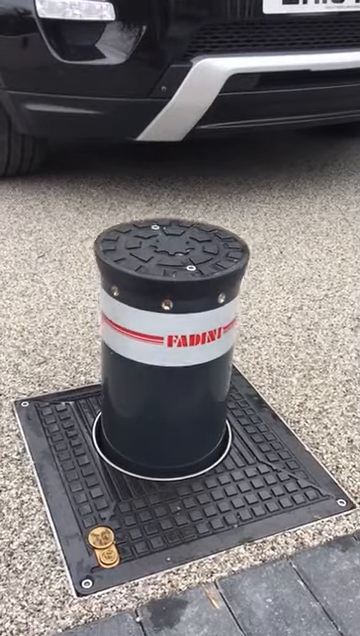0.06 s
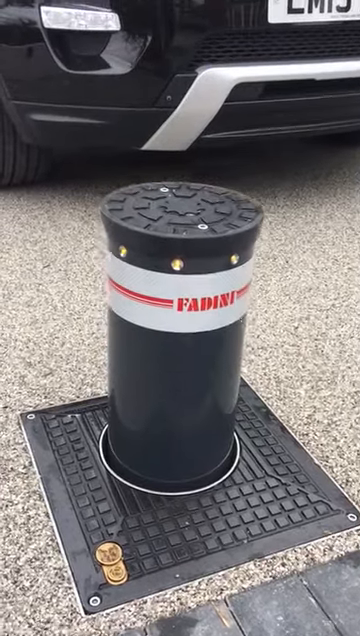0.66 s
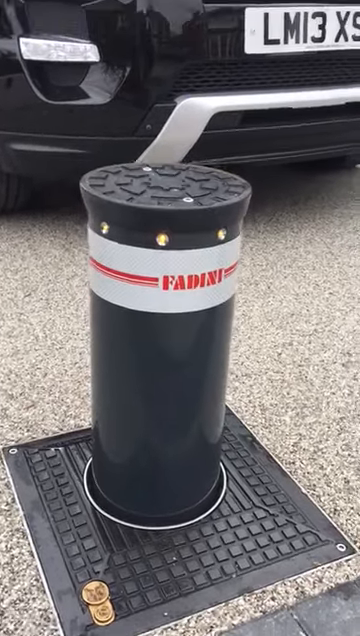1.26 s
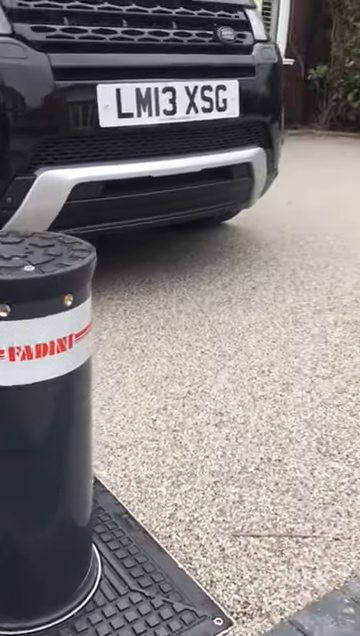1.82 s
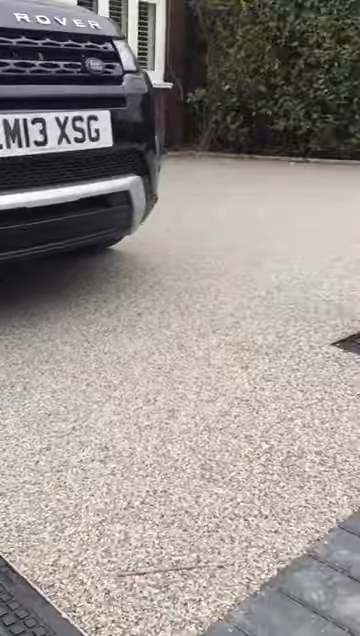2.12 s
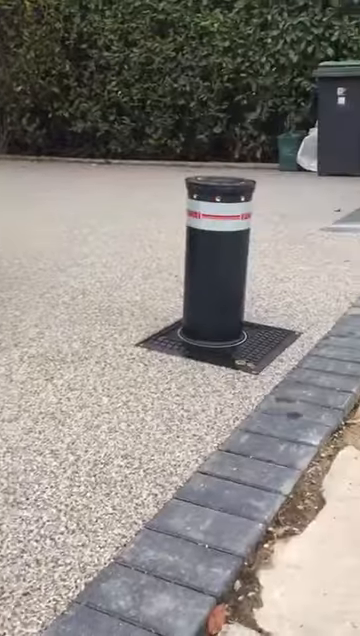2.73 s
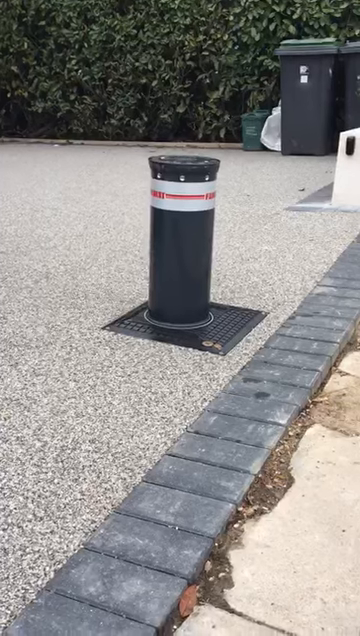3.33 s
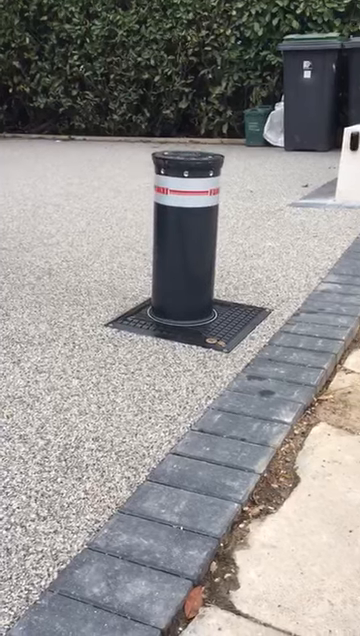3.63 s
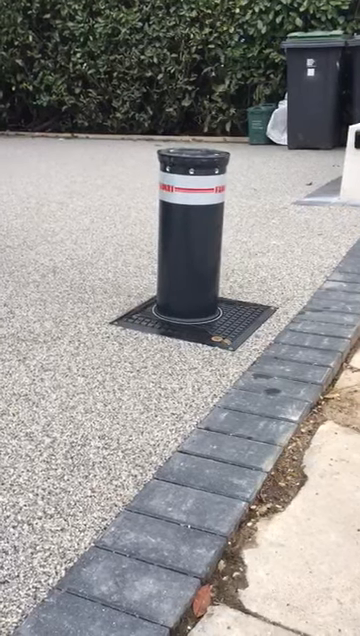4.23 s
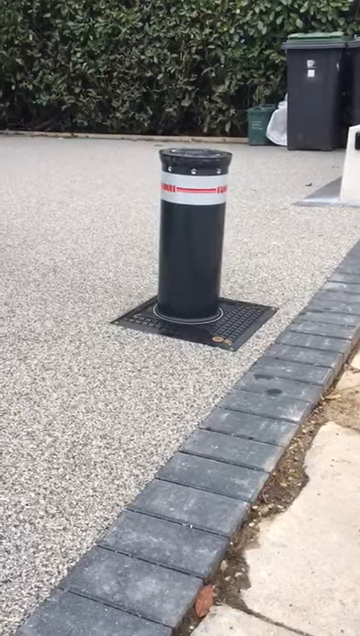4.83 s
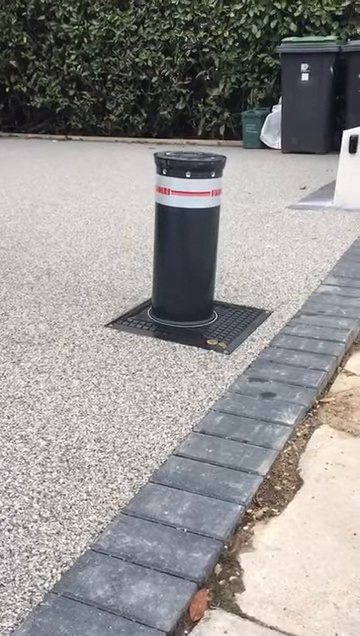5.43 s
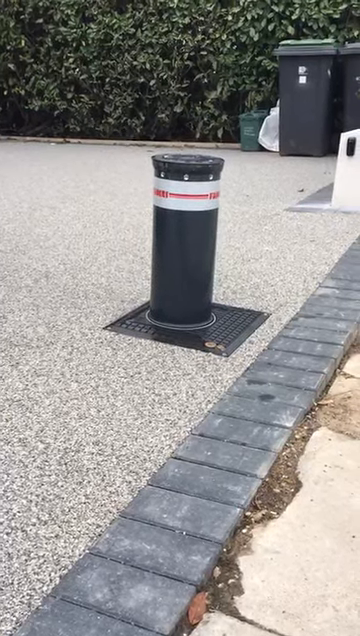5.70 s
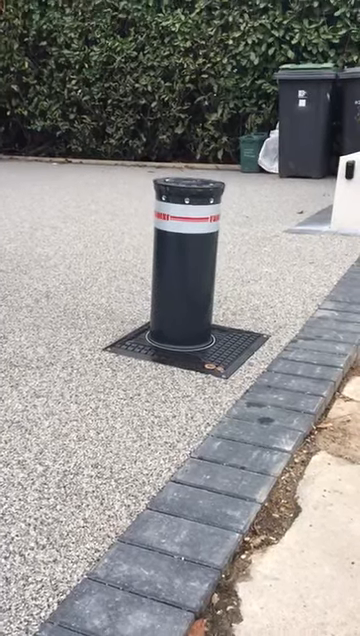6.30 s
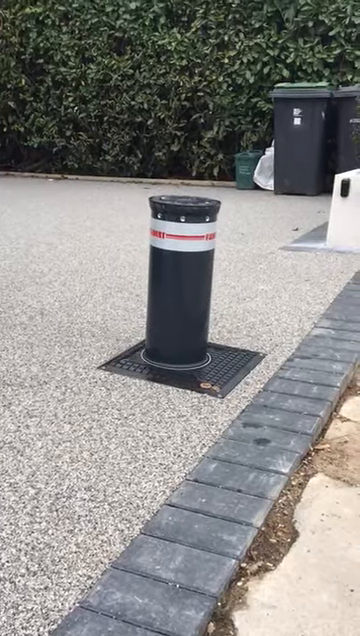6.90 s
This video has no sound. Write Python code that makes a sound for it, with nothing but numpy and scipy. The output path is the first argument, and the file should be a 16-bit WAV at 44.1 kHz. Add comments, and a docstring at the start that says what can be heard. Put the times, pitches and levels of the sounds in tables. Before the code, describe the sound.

A motorized bollard rises with a hydraulic whir and hiss, then stops, leaving idling engines throbbing and cars passing nearby.

```python
"""A bollard rising in a driveway

Motor and hydraulic pump whir, oil hisses through a valve, and a whistle sinks as the steel tube lifts;
the pump eases near the top and cuts out at about 2 s. Two idling engines, one nearer, one farther off,
beat against each other while cars pass out on the road. A breeze nudges the hand-held microphone."""
import sys
import numpy as np
from scipy import signal
from scipy.fft import rfft, irfft, next_fast_len
from scipy.io import wavfile

SR = 44100
rng = np.random.default_rng(int(sys.argv[2]) if len(sys.argv) > 2 else 0)


def wav_record(signal):
    """Record a signal, one row per channel, as 16-bit PCM in the file named by sys.argv[1]."""
    frames = np.transpose(np.atleast_2d(signal))
    bounded = np.clip(frames, -1, 1)
    # unit amplitude maps onto the largest positive 16-bit level
    quanta = np.round(bounded * 32767).astype(np.int16)
    wavfile.write(sys.argv[1], SR, quanta)


N = 315315
TIME = np.arange(N) / SR


def from_db(db):
    """Decibels to gain."""
    return 10 ** (np.asarray(db) / 20)


def unit_power(x):
    """Scale to an RMS of 1."""
    return x / np.sqrt(np.mean(x ** 2) + 1e-20)


def in_time(rows):
    """One value per sample for each column after the time column."""
    times, *columns = np.transpose(rows)
    return [np.interp(TIME, times, column) for column in columns]


def bell(x, width):
    """A smooth hump of height 1 around zero."""
    return np.exp(-(x / width) ** 2)


def hump(at_s, half_s, height):
    """A rise to the given height and a fall back to zero."""
    return height * bell(TIME - at_s, half_s)


def shift(at_s, over_s, change):
    """A lasting linear change, half done at at_s."""
    return change * np.clip((TIME - at_s) / over_s + .5, 0, 1)


def turning(hz):
    """The angle of something that turns at this rate."""
    return 2 * np.pi * np.cumsum(hz + np.zeros(N)) / SR


def tone(angle):
    """A sine of unit power with a random starting phase."""
    return np.sqrt(2) * np.sin(angle + rng.uniform(0, 2 * np.pi))


def drift(hz):
    """Smooth random motion of spread 1, mostly slower than hz."""
    step, settle = 40, 2000   # samples per step; steps for the filter to settle
    pole = np.exp(-2 * np.pi * hz * step / SR)
    white = rng.standard_normal(N // step + settle + 2)
    slow = signal.lfilter([1], [1, -2 * pole, pole * pole], white)[settle:]
    return np.interp(np.arange(N) / step, np.arange(len(slow)), unit_power(slow))


def noise(spectrum):
    """Unit-power noise coloured by (frequency [Hz], relative level [dB]), falling away beyond the ends."""
    size = next_fast_len(N)
    hz, db = np.transpose(spectrum)
    bins = np.maximum(np.arange(size // 2 + 1) * SR / size, 1)
    skirts = (np.minimum(bins / hz[0], 1) * np.minimum(hz[-1] / bins, 1)) ** 2
    gain = from_db(np.interp(np.log(bins), np.log(hz), db)) * skirts
    return unit_power(irfft(rfft(rng.standard_normal(size)) * gain, size)[:N])


def narrow_noise(hz, spread_hz):
    """A rough tone of random strength and phase, at unit power."""
    angle = turning(hz)
    return drift(spread_hz) * np.sin(angle) + drift(spread_hz) * np.cos(angle)


def stroke(full_db, eased_by_db, lag_s=0, coast_s=0):
    """Gain of one part of the bollard's drive: full flow, eased near the top, then running down."""
    ease_s, stop_s, run_down_db_per_s = 1.611, 1.984, 270
    easing_db = shift(ease_s + lag_s, over_s=0.064, change=eased_by_db)
    run_down_db = run_down_db_per_s * np.clip(TIME - stop_s - coast_s, 0, 1)
    return from_db(full_db + easing_db - run_down_db)


# The tube's resonance, sinking as it rises from the driveway: (time [s], frequency [Hz], lift [dB])
TUBE_RESONANCE = [(0, 5100, -3), (.22, 4740, 0), (.36, 4480, 6), (.47, 4310, 13), (.55, 4260, 9),
                  (.62, 4150, 5), (.71, 4040, 9.5), (.8, 3950, 9), (.94, 3747, 13), (1.05, 3640, 16),
                  (1.16, 3576, 15.5), (1.3, 3520, 13), (1.41, 3440, 4), (1.5, 3400, 2), (1.62, 3350, -10)]

def tube_whistle(base_db=-64.5):
    """Turbulence rings the resonance of the lengthening tube."""
    centre_hz, lift_db = in_time(TUBE_RESONANCE)
    return from_db(base_db + lift_db) * narrow_noise(centre_hz, spread_hz=70)


# The pump's tones: (multiple of the pump rate, relative level [dB])
PUMP_HARMONICS = [(6, -57), (12, -58), (16, -63), (17, -58.5), (20, -60), (21, -68.5), (23, -64),
                  (24, -60.5), (25, -62), (27, -61), (28, -59.5), (32, -66), (33, -60), (35, -65),
                  (36, -63.5), (37, -61.5), (39, -62.5), (41, -62.5), (42, -65), (43, -60), (44, -68),
                  (45, -63.5), (46, -66), (47, -63.5), (49, -66.5), (53, -62), (54, -62.5), (66, -65)]
# Brief swells of the closest harmonic: (time [s], half length [s], frequency [Hz], lift [dB])
PUMP_SWELLS = [(.55, 0.32, 2694, 4), (0.76, .12, 4425, 10), (.925, 0.13, 1539, 14.5),
               (1.146, 0.12, 2212, 17), (1.2, .2, 5195, 3), (1.36, .12, 2309, 9.5), (1.428, 0.2, 2020, 16),
               (1.47, .1, 4714, 11), (1.479, .09, 3367, 11), (1.945, 0.075, 3367, 12),
               (1.91, 0.05, 4329, 6)]
PUMP_HZ = 96.2

def pump_whine(angle, sung_db=-59.5, width_hz=92, waver_db=3.0):
    """Pump harmonics; each sings out as the tube's resonance slides across it."""
    centre_hz, lift_db = in_time(TUBE_RESONANCE)
    resonance = from_db(sung_db + lift_db)
    whine = np.zeros(N)
    for order, db in PUMP_HARMONICS:
        level_db = db + waver_db * drift(6.8)
        for at_s, half_s, hz, swell_db in PUMP_SWELLS:
            if round(hz / PUMP_HZ) == order:
                level_db += hump(at_s, half_s, swell_db)
        sung = resonance * bell(order * PUMP_HZ - centre_hz, width_hz)
        whine += np.hypot(from_db(level_db), sung) * tone(order * angle)
    return whine


def pump_buzz(angle, base_db=-71.5, scatter_db=6.5):
    """Faint, uneven upper harmonics of the pump give the hiss a metallic edge."""
    orders = np.arange(55, 104)
    gains = from_db(base_db + scatter_db * rng.uniform(-1, 1, len(orders)))
    return sum(gain * tone(order * angle) for order, gain in zip(orders, gains))


# Oil in the valve: (frequency [Hz], relative level [dB])
VALVE_SPECTRUM = [(700, -12), (1300, -1), (2000, 3), (2500, 1), (2900, -0.5), (3600, 2), (4400, 1),
                  (4900, -0.5), (5700, 0.5), (6200, 0.5), (7200, -2), (8200, 3.5), (9600, -2), (10500, 2.5)]

def oil_hiss(angle, ripple=0.038):
    """Oil hisses through the valve, its flow pulsing with the pump."""
    pulsing = 1 + ripple * np.sin(angle)
    return stroke(full_db=-42.5, eased_by_db=-8) * noise(VALVE_SPECTRUM) * pulsing


# Oil heard through the casing: (frequency [Hz], relative level [dB])
CASING_SPECTRUM = [(100, -34), (190, -3.5), (260, -1.5), (320, -2), (385, 1), (425, -7.5), (620, -7),
                   (800, -10), (1150, -18.5), (1800, -32), (4000, -60.5)]
COAST_S = 0.012   # the motor runs on after the valve shuts

def oil_churn(base_db=-40.5, surge_db=3.1, rough_db=2.0):
    """Oil churns in the casing, hardest in mid-stroke, and follows the valve a little late."""
    full_db = base_db + hump(0.76, 0.32, surge_db) + rough_db * drift(33)
    return stroke(full_db, eased_by_db=-9, lag_s=0.08, coast_s=COAST_S) * noise(CASING_SPECTRUM)


# The motor at full flow: (frequency [Hz], level [dB])
MOTOR_TONES = [(299.7, -39.5), (384.3, -50), (399.6, -53)]

def motor_hum(waver_db=0.6):
    """Steady low tones of the motor, a touch louder once the pump eases."""
    hum = sum(from_db(db + waver_db * drift(2.3)) * tone(turning(hz)) for hz, db in MOTOR_TONES)
    return stroke(full_db=0, eased_by_db=0.5, coast_s=COAST_S) * hum


# Squeaks at the collar: (time [s], half length [s], frequency [Hz], half width [Hz], level [dB])
COLLAR_RUBS = [(.08, .12, 2970, 150, -53), (.75, .1, 4450, 90, -58), (1.33, .05, 4840, 90, -55),
               (1.38, .17, 2253, 330, -52.5), (1.94, .06, 3350, 60, -57)]

def collar_squeaks():
    """The sliding tube rubs in its collar with short, rough squeaks."""
    return sum(hump(at_s, half_s, from_db(db)) * narrow_noise(hz, spread_hz)
               for at_s, half_s, hz, spread_hz, db in COLLAR_RUBS)


def bollard(wobble=0.0007):
    """A motor turns the pump, whose oil pushes the steel tube up out of the driveway."""
    angle = turning(PUMP_HZ * (1 + wobble * drift(5.2)))
    whine = pump_whine(angle) + pump_buzz(angle) + tube_whistle()
    whine *= stroke(full_db=-2, eased_by_db=-6)
    return whine + oil_hiss(angle) + oil_churn() + motor_hum() + collar_squeaks()


# Overtones of the nearer engine: (multiple of the firing rate, relative level [dB])
ENGINE_OVERTONES = [(2, -11.9), (3, -29.5), (3.25, -20.5), (3.77, -32), (3.95, -28), (4.3, -24.8),
                    (5.25, -32.5)]
# How much faster the farther engine fires: (time [s], beat rate [Hz])
ENGINE_BEAT = [(0, 5.75), (2.2, 5.85), (3.4, 6.03), (4.6, 7.25), (5.2, 7.34), (6.0, 7.24), (7.15, 6.42)]
# Brief swells and dips of the drone: (time [s], half length [s], change [dB])
DRONE_LURCHES = [(0, .06, -2), (0.142, 0.02, 7.5), (0.2, 0.045, -8), (.48, .04, 2.5), (1.202, 0.018, 3),
                 (1.42, 0.062, -2.5), (1.665, 0.016, 4.5), (2.106, 0.018, -2.5), (2.854, 0.0087, 4)]

def exhaust_drone(firing_hz=60.5, wobble=0.0012, overtones_db=-26.5, waver_db=0.5):
    """Two idling exhausts, a few hertz apart, throb together at the microphone."""
    near_db = -24.5 + shift(at_s=2.8, over_s=0.092, change=-1.97)
    far_db = -48 + shift(at_s=4.85, over_s=0.9, change=8.2)   # comes up and deepens the throb
    beat_hz, = in_time(ENGINE_BEAT)
    angle = turning(firing_hz * (1 + wobble * drift(1.74)))
    near = from_db(near_db) * np.sin(angle)
    far = from_db(far_db) * np.sin(angle + turning(beat_hz))
    lurch_db = sum(hump(*lurch) for lurch in DRONE_LURCHES)
    drone = np.sqrt(2) * (near + far) * from_db(lurch_db)
    for multiple, db in ENGINE_OVERTONES:
        drone += from_db(overtones_db + db + waver_db * drift(2.9)) * tone(multiple * angle)
    return drone


# Clatter at idle: (frequency [Hz], relative level [dB])
CLATTER_SPECTRUM = [(120, -25), (155, -14.5), (175, -5.5), (203, 4), (222, -2), (250, -1), (280, -7.5),
                    (320, -11.5), (400, -33)]

def engine_clatter(level_db=-45, rough_db=1.1):
    """The idling engines give off a dull, uneven clatter."""
    return from_db(level_db + rough_db * drift(10.0)) * noise(CLATTER_SPECTRUM)


# Cars at their closest to the microphone:
# (time [s], half passing time [s], tyre roar [dB], tyre swish [dB], road rumble [dB])
CAR_PASSES = [(0.3, 0.8, -50.5, -53, -53.5), (1.8, 0.49, -65.5, -48, -52.5), (2.4, 0.42, -63.5, -61.5, -48),
              (3.3, 0.43, -55, -48.5, -65.5), (4.1, 0.54, -62, -50.5, -57), (5.85, 1, -48.5, -55.5, -56.5),
              (7.05, 0.47, -44.5, -52.5, -52.5)]

def passing_gains(falloff=1.44):
    """Gains of roar, swish and rumble; hedges make each car fade faster than distance alone would."""
    power = 0
    for at_s, half_s, *levels_db in CAR_PASSES:
        distance = np.hypot(1, (TIME - at_s) / half_s)   # in units of the closest distance
        power = power + (from_db(levels_db)[:, None] / distance ** falloff) ** 2
    return np.sqrt(power)


# Tyres on the road, heard from the driveway: each (frequency [Hz], relative level [dB])
ROAR_SPECTRUM = [(280, -9), (400, -6), (520, -7.5), (680, -8), (800, 0), (980, 1), (1250, -4.5),
                 (1700, -9.5), (2200, -14.5), (2800, -19), (3600, -27.5), (8000, -44.5)]
SWISH_SPECTRUM = [(600, -15), (900, -4.5), (1150, 1), (1700, -1), (1950, -5.5), (2300, -12), (2700, -12),
                  (3400, -28), (7000, -33.5)]
RUMBLE_SPECTRUM = [(250, -7.5), (400, -6), (650, 2.5), (800, -1), (1000, -18), (2000, -38)]
# The swish surges and slackens: (time [s], half length [s], change [dB])
SWISH_SURGES = [(2.7, .15, 0), (2.97, .1, 2.5), (3.28, 0.075, 1.5), (3.77, .1, -0.5), (3.977, 0.068, 2.5)]
# Treads sing out over rougher patches of road: (time [s], half length [s], lift [dB])
ROUGH_PATCHES = [(4.85, .12, 6.5), (5.47, .13, 5), (5.97, .13, 6.5), (6.85, 0.45, 2.5)]

def traffic(far_roar_db=-50.5, tread_hz=995, flutter_db=1.0):
    """Tyres roar, swish and rumble past, over the unbroken roar of far traffic."""
    roar_gain, swish_gain, rumble_gain = passing_gains()
    roar_gain = np.hypot(roar_gain, from_db(far_roar_db))
    swish_gain *= from_db(sum(hump(*surge) for surge in SWISH_SURGES))
    tread_db = -10 + sum(hump(*patch) for patch in ROUGH_PATCHES)   # relative to the roar
    roar = noise(ROAR_SPECTRUM) + from_db(tread_db) * narrow_noise(tread_hz, spread_hz=62)
    layers = [(roar_gain, roar),
              (swish_gain, noise(SWISH_SPECTRUM)),
              (rumble_gain, noise(RUMBLE_SPECTRUM))]
    return sum(gain * from_db(flutter_db * drift(10.3)) * sound for gain, sound in layers)


# The street's background: (frequency [Hz], relative level [dB])
STREET_SPECTRUM = [(20, -7), (40, 4.5), (60, 7), (85, 2), (150, -0.5), (320, -6), (450, -15.5), (800, -23),
                   (2000, -27), (3500, -29.5), (4700, -31), (5400, -29.5), (7000, -36), (10500, -34.5)]
# Whines in the street: (time [s], half length [s], frequency [Hz], half width [Hz], level [dB])
STREET_WHINES = [(3.9, 3.3, 2371, 55, -65), (4.3, 2.8, 2750, 50, -66), (4.5, 4, 3150, 46, -70),
                 (4.95, .9, 3100, 70, -65), (4.4, 2.2, 5380, 130, -70), (2.3, .45, 5450, 300, -66.5),
                 (3.7, 0.092, 5100, 120, -66), (4.85, 0.092, 4930, 60, -69), (6.8, 0.15, 5090, 40, -69)]

def street(wash_db=-42):
    """Faint, rough whines come and go over the steady low wash of the street."""
    whines = sum(hump(at_s, half_s, from_db(db)) * narrow_noise(hz, spread_hz)
                 for at_s, half_s, hz, spread_hz, db in STREET_WHINES)
    return whines + from_db(wash_db) * noise(STREET_SPECTRUM)


# Gusts right on the microphone: (time [s], half length [s], level [dB])
MIC_GUSTS = [(0.083, 0.2, -36), (0.7, 0.86, -38), (1.88, 0.4, -41)]

def breeze(lumpy_db=3.5):
    """Moving air buffets the microphone with a lumpy rumble."""
    spectrum = [(25, -17.0), (45, -8.5), (75, -4), (130, -10.0), (250, -28), (1000, -69)]
    gusts = sum(hump(at_s, half_s, from_db(db)) for at_s, half_s, db in MIC_GUSTS)
    return gusts * from_db(lumpy_db * drift(5.8)) * noise(spectrum)


# Low pulses a few cycles long: (time [s], peak level [dB], frequency [Hz], half length [s])
LOW_PULSES = [(0.091, -31, 115, 0.025), (.25, -31, 115, 0.023), (0.409, -31, 113, .025),
              (2.858, -26, 98, 0.011)]

def low_pulses():
    """Three soft pulses in the low hum at the start, and one dull thump later."""
    return sum(hump(at_s, half_s, from_db(db)) * np.sin(2 * np.pi * hz * (TIME - at_s))
               for at_s, db, hz, half_s in LOW_PULSES)


# Swells in the low hum: (time [s], frequency [Hz], level [dB])
LOW_HUM_SWELLS = [(2.11, 260, -43.5), (2.27, 200, -43), (2.62, 260, -44), (2.78, 203, -40),
                  (3.12, 197.2, -42.5), (3.38, 203, -40), (3.51, 203, -39), (3.72, 201, -40),
                  (3.8, 250.5, -43.5), (3.91, 199.6, -41), (4.02, 240.2, -40), (4.3, 240.5, -44),
                  (4.53, 205, -38), (4.67, 203.5, -39), (4.77, 259, -43), (5.22, 203, -41),
                  (5.5, 200.4, -40.5), (5.73, 197, -35.5), (6.08, 203, -39), (6.4, 203.4, -38),
                  (6.62, 235, -41), (6.95, 253.6, -39)]

def low_hum_swells(half_s=0.06):
    """Short, uneven swells of low hum between about 200 and 260 Hz."""
    return sum(hump(at_s, half_s, from_db(db)) * tone(turning(hz)) for at_s, hz, db in LOW_HUM_SWELLS)


# A sleeve beside the microphone: (time [s], half length [s], level [dB])
SLEEVE_BRUSHES = [(6.3, 0.22, -54), (6.375, 0.043, -56.5)]
# Brushing cloth: (frequency [Hz], relative level [dB])
CLOTH_SPECTRUM = [(1200, 5), (2700, 1), (4000, -5.5), (6000, -5), (8000, -13), (10000, -11)]

def sleeve():
    """Cloth brushes softly and catches once as the hand tilts."""
    brushing = sum(hump(at_s, half_s, from_db(db)) for at_s, half_s, db in SLEEVE_BRUSHES)
    return brushing * noise(CLOTH_SPECTRUM)


def scene():
    """Driveway and road reach one hand-held microphone, in mono."""
    driveway = bollard() + exhaust_drone() + engine_clatter() + low_pulses() + low_hum_swells()
    road = traffic() + street()
    at_microphone = breeze() + sleeve()
    return (driveway + road + at_microphone)[None]


def record(dry):
    """Both ends fade over a moment, and the top of the treble is cut steeply."""
    fade_s, cutoff_hz = 0.002, 10150
    fade = np.clip(np.minimum(TIME, TIME[-1] - TIME) / fade_s, 0, 1)
    lowpass = signal.ellip(10, .2, 80, cutoff_hz, fs=SR, output="sos")
    return signal.sosfilt(lowpass, dry * fade)


dry = scene()
out = record(dry)
wav_record(out)
```